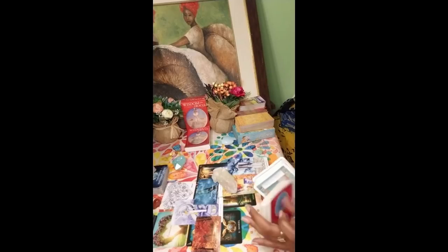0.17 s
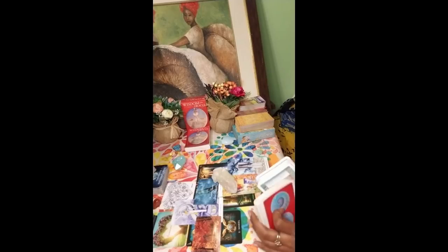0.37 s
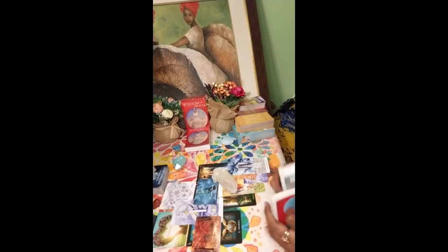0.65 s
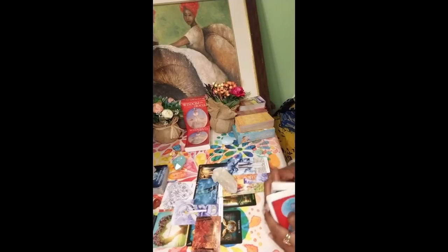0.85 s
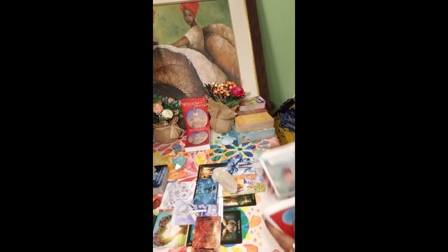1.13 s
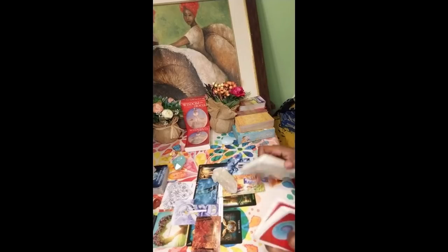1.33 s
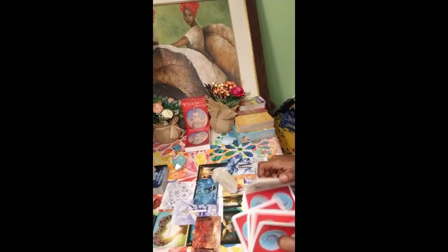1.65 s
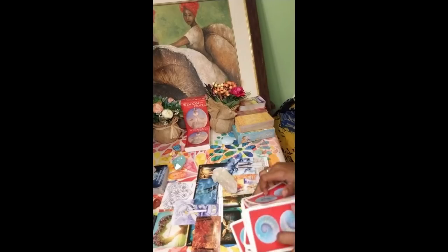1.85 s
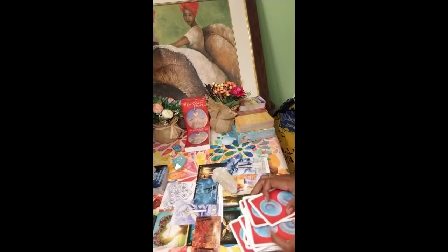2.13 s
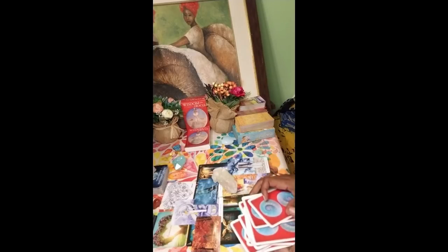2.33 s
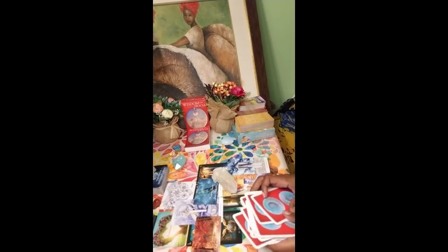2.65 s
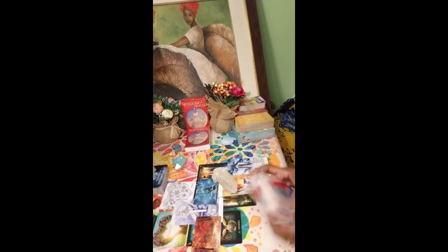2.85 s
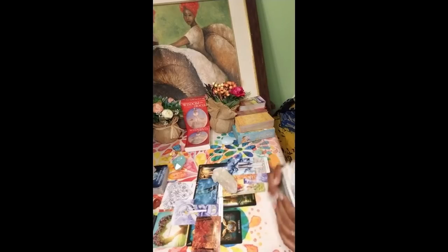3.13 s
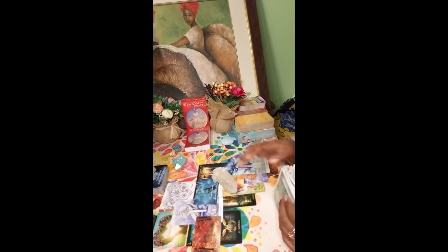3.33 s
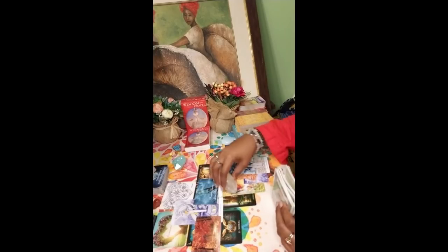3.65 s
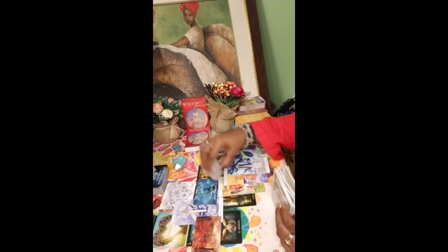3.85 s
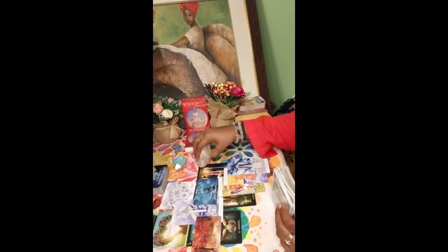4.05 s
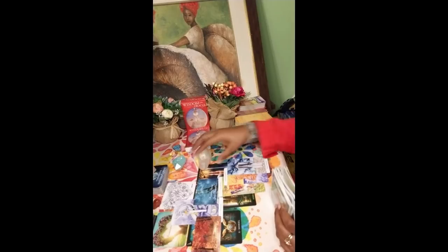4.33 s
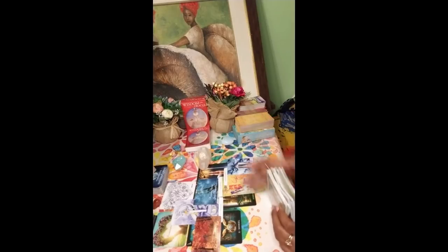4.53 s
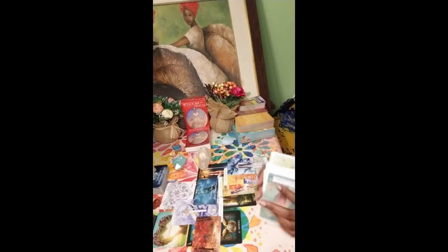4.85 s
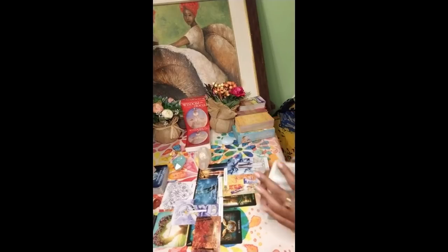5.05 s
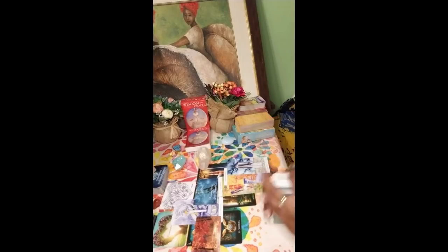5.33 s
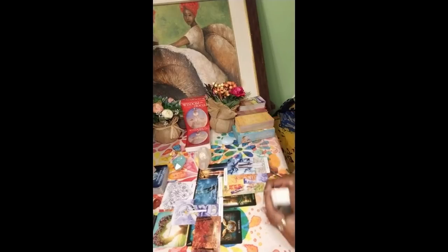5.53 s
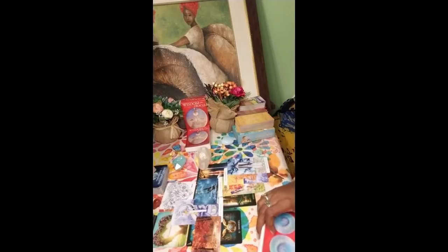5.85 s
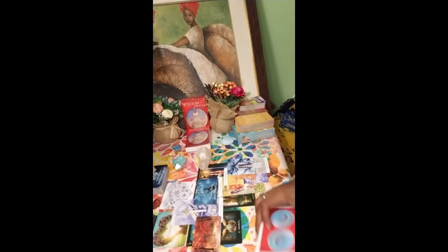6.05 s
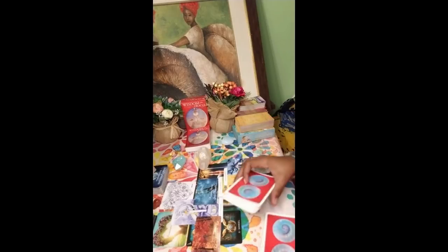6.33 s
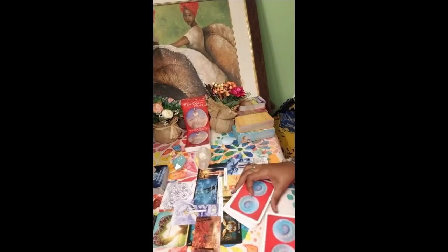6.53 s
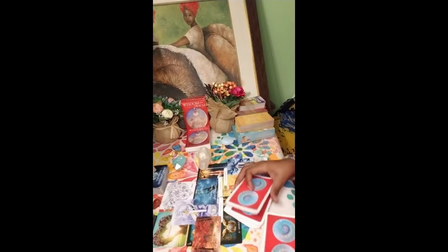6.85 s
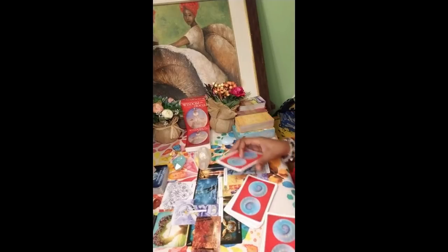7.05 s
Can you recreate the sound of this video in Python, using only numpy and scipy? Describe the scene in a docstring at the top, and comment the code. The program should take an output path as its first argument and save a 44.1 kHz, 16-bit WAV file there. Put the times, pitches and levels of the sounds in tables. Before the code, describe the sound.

In a small room, a deck of cards is knocked on a cloth-covered table close by, then spills from hand to hand in a quick run of snaps and rustles. A small stone clicks against fingernails and is set down, and a sleeve swishes softly. More sliding and knocking follows as the deck is squared and piles are laid down. A bird calls faintly outside, and a faint cat mew begins at the end.

```python
"""A deck of large cards is handled close by, at a cloth-covered table in a small room.
Knocking it square and laying down piles rings the table's modes; card faces hiss and scrape as they
slide, and packets spill from hand to hand with snapping edges. A small stone clicks as it is moved
and a sleeve brushes past. Outside a bird repeats a falling call, and at the end a cat starts a faint
mew, all over a low room tone."""
import sys
import numpy as np
from scipy import signal
from scipy.fft import rfft, irfft, next_fast_len
from scipy.io import wavfile
from scipy.ndimage import map_coordinates

SR = 44100
rng = np.random.default_rng(int(sys.argv[2]) if len(sys.argv) > 2 else 0)


def int16_out(signal):
    """Quantize to a 16-bit WAV file."""
    q = np.round(np.clip(np.atleast_2d(signal).T, -1, 1) * 32767)
    wavfile.write(sys.argv[1], SR, q.astype(np.int16))


N = 316544


def amp(db):
    return 10 ** (np.asarray(db) / 20)


def along(points, hz):
    """Read a curve of (hz, value) points on a log frequency axis."""
    f, v = np.transpose(points)
    return np.interp(np.log(hz + 1), np.log(f + 1), v)


def wobble(rate):
    """A smooth random curve, rate knots a second."""
    return map_coordinates(rng.standard_normal(int(N * rate / SR) + 4), [np.arange(N) * rate / SR])


def filtered(x, response):
    """Equalise x with a gain given as a function of frequency."""
    size = next_fast_len(N + SR // 2)
    return irfft(rfft(x, size) * response(np.fft.rfftfreq(size, 1 / SR)), size)[..., :N]


def noise(eq, grain_db=0):
    """Coloured noise of rms 1; grain_db clumps it into millisecond grains."""
    grains = rng.standard_normal(N) * amp(grain_db * (wobble(900) + wobble(90) / 2))
    coloured = filtered(grains, lambda hz: amp(along(eq, hz)))
    return coloured / np.sqrt(np.mean(coloured ** 2) + 1e-20)


def causal(gain):
    """The most compact impulse response with this gain."""
    cepstrum = irfft(np.log(np.maximum(gain, 1e-6)))
    half = len(cepstrum) // 2
    return irfft(np.exp(rfft(np.r_[cepstrum[0], 2 * cepstrum[1:half], np.zeros(half)])))


def add(track, start_s, sound):
    """Mix a sound into the track."""
    part = track[max(round(start_s * SR), 0):][:len(sound)]
    part += sound[:len(part)]


# The small room's reverb time: freq_hz, t60_s
ROOM_DECAY = [(100, 0.32), (500, 0.26), (3000, 0.35), (8000, 0.28), (15000, 0.061)]

def room(x, wet_db, build_s=0.0076):
    """Direct sound plus a diffuse tail that builds up and dies fastest in the top treble."""
    hz, t, spectrum = signal.stft(rng.standard_normal(SR // 2), SR, nperseg=256)
    decay = amp(-60 * t / along(ROOM_DECAY, hz)[:, None])
    build = 1 - np.exp(-(t / build_s) ** 2)
    tail = signal.istft(spectrum * decay * build, SR, nperseg=256)[1]
    response = amp(wet_db) * tail / np.linalg.norm(tail)
    response[0] += 1
    return signal.fftconvolve(x, response)


# Colour of the room tone: freq_hz, gain_db
ROOM_TONE_EQ = [(20, -12), (45, -7.5), (115, -2.5), (220, -15), (400, -18.5), (800, -25), (1600, -30),
                (3300, -31), (4500, -25.5), (5600, -28.5), (6800, -28), (7700, -31.5), (10000, -35),
                (16000, -39.5)]

def room_tone(bed_db=-62, hum_hz=119, hum_db=-69, drift_db=-0.2):
    """A bed of rumble and hiss that drifts a little, and a wavering low hum."""
    hum_gain = amp(hum_db + 2 * wobble(5.9))
    hum = hum_gain * np.sin(2 * np.pi * hum_hz * np.arange(N) / SR + wobble(6.4))
    return amp(bed_db + drift_db * wobble(5.5)) * noise(ROOM_TONE_EQ) + hum


# A hand or a cut pile meets the table once: start_s, level_db, weight_db, hardness_db
TOUCHES = [(0.117, -49.5, 13.5, -35), (0.367, -57.5, 11.5, -16), (3.344, -63.5, 12, -9),
           (4.167, -52, 10.5, -40), (4.335, -38, 5, -20), (4.767, -53.5, 3, 2), (5.898, -53, 3.5, -4),
           (6.485, -42.5, 7.5, -5)]
# The deck is knocked square: flat_s, level_db, weight_db, hardness_db, corner_lead_s, edge_lead_s
DECK_KNOCKS = [(0.899, -31.5, 5, 4.5, 0.041, 0.008), (3.182, -40, -3.5, -2, 0.025, 0.013),
               (5.115, -35.5, -9.5, 5, 0.033, 0.022), (5.377, -37.5, 2, -2, 0.03, 0.011)]

def blows():
    """Cue every contact with the table: start_s, level_db, weight_db, hardness_db."""
    cues = TOUCHES + [(s, db - 5.5, -3, 2) for s, db in PACKET_DROPS]  # each packet bumps the table
    for s, db, weight, hardness, corner_lead, edge_lead in DECK_KNOCKS:
        cues += [(s - corner_lead, db - 8, weight, hardness - 9.5),  # a corner lands first,
                 (s - edge_lead, db, weight, hardness - 9),  # then an edge,
                 (s, db, weight, hardness)]  # then the deck lands flat
    return cues


# Modes of the table top with the deck on it: pitch_hz, level_db, t60_s
TABLE_MODES = [(62.2, 0, 0.18), (96.2, 7, 0.1), (125, 8.5, 0.073), (169.4, 2, 0.11), (260.7, 2.5, 0.074),
               (331.7, -6, 0.11), (396, -2.5, 0.065), (513.5, -3, 0.087), (611, 3, 0.053), (687, -14, 0.15),
               (952, -14, 0.043), (1176, -24.5, 0.13), (2780, -30, 0.028)]

def table_knocks(thud_db=-4, body_db=1, clack_db=2, rise_cycles=0.28, press_s=0.00046):
    """The weight of a blow moves the table's low modes; its hardness rings the high ones."""
    out, t = np.zeros(N), np.arange(SR // 4) / SR
    hz, mode_db, t60 = np.transpose(TABLE_MODES)[:, :, None]
    cushion = (1 - np.exp(-t / (press_s + rise_cycles / hz))) ** 2  # the cloth softens the attack
    for s, db, weight, hardness in blows():
        eq = [(125, thud_db + weight), (200, body_db), (380, body_db), (520, clack_db + hardness)]
        # each spot and grip weights, detunes and turns the modes anew
        spot_db, detune, phase = rng.standard_normal((3, len(TABLE_MODES), 1))
        envelope = cushion * amp(db + along(eq, hz) + mode_db + spot_db - 60 * t / t60)
        modes = envelope * np.sin(2 * np.pi * hz * (1 + 0.018 * detune) * t + phase)
        add(out, s, room(modes.sum(0), wet_db=-11))
    return out


def stroke(peak_s, rise_s, fall_s, range_db=21):
    """Envelope of a movement that gains range_db over its rise and loses it over its fall."""
    t = np.arange(N) / SR - peak_s
    distance = np.maximum(-t / rise_s, t / fall_s)
    return amp(-range_db * np.minimum(distance, 10))


# Card slides on card: peak_s, rise_s, fall_s, hiss_db, scrape_db
CARD_SLIDES = [(0.145, 0.057, 0.63, -67, -77), (0.901, 0.019, 0.094, -69, -52.5),
               (2.42, 0.025, 0.15, -62.5, -63), (2.965, 0.18, 0.076, -61.5, -55),
               (3.178, 0.12, 0.14, -60, -59.5), (4.609, 0.019, 0.14, -57.5, -58),
               (4.705, 0.08, 0.14, -58.5, -64), (4.865, 0.23, 0.15, -61.5, -68),
               (5.11, 0.041, 0.41, -65.5, -73), (5.379, 0.0099, 0.13, -64.5, -67),
               (5.912, 0.28, 0.09, -63.5, -72), (6.488, 0.042, 0.095, -58.5, -58)]
# Colours of a light and of a pressed slide: freq_hz, gain_db
HISS_EQ = [(1500, -41), (2600, -8), (4500, 3.5), (7000, 1.5), (11000, -1), (16000, -15)]
SCRAPE_EQ = [(150, -1), (450, -1.5), (900, -1.5), (1500, -7), (2300, -1), (3200, -3.5), (5000, -21)]

def card_slides(hiss_trim_db=-1, scrape_trim_db=2):
    """Faces rub in tiny slips: a light stroke hisses, a pressed one scrapes."""
    hiss, scrape = noise(HISS_EQ, grain_db=2.5), noise(SCRAPE_EQ, grain_db=2.5)
    out = np.zeros(N)
    for s, rise, fall, hiss_db, scrape_db in CARD_SLIDES:
        friction = amp(hiss_db + hiss_trim_db) * hiss + amp(scrape_db + scrape_trim_db) * scrape
        out += stroke(s, rise, fall) * friction
    return out


def wavering_phase(hz, waver):
    """Phase of a tone whose pitch jitters by the fraction waver."""
    return 2 * np.pi * np.cumsum(hz * (1 + waver * wobble(250))) / SR


# The bird's falling calls: start_s, level_db
BIRD_CALLS = [(0.791, -56), (2.165, -54.5), (2.885, -51.5), (3.663, -57), (4.534, -55.5)]
# Contour of one call: offset_s, pitch_hz, gain_db
CALL_CONTOUR = [(0, 3487, -6), (0.016, 3497, -7), (.045, 3400, -11), (0.058, 2950, -8), (.08, 2550, -2.5),
                (0.114, 2800, -26), (0.15, 2360, -9)]
# Its low, gliding whistles: start_s, length_s, from_hz, to_hz, level_db
BIRD_WHISTLES = [(2.398, 0.3, 2020, 1970, -75), (3.059, 0.13, 2470, 2170, -64.5),
                 (3.259, 0.18, 2054, 2316, -68)]

def bird(trim_db=-10):
    """A clear high note tumbles into a rasp, with low whistles between; heard mostly by reflection."""
    t, song = np.arange(N) / SR, np.zeros(N)
    offset_s, pitch_hz, contour_db = np.transpose(CALL_CONTOUR)
    for s, db in BIRD_CALLS:
        rasp = np.interp(t - s, [0.04, 0.07], [0.028, 0.085])
        envelope = amp(db + np.interp(t - s, offset_s, contour_db, left=-np.inf, right=-np.inf))
        song += envelope * np.sin(wavering_phase(np.interp(t - s, offset_s, pitch_hz), waver=rasp))
    for s, length, from_hz, to_hz, db in BIRD_WHISTLES:
        progress = np.clip((t - s) / length, 0, 1)
        glide_hz = from_hz + (to_hz - from_hz) * progress
        song += amp(db) * np.sin(np.pi * progress) * np.sin(wavering_phase(glide_hz, waver=0.04))
    return amp(trim_db) * room(song, wet_db=8, build_s=0.016)[:N]


def ticks(cues, eq, chatter_t60_s, wet_db, ring_db=0, ring_octaves=1, chatter=0.14, trim_db=0.5):
    """Sharp contacts with a brief chatter; ring_db lifts one broad resonance at each cue's pitch."""
    out, t = np.zeros(N), np.arange(1024) / SR
    hz = np.fft.rfftfreq(len(t), 1 / SR)
    for s, db, pitch_hz in cues:
        force = chatter * rng.standard_normal(len(t)) * amp(-60 * t / chatter_t60_s)
        force[0] = -1  # the first contact
        resonance_db = ring_db * np.exp(-(np.log2((hz + 1) / pitch_hz) / ring_octaves) ** 2)
        tick = signal.fftconvolve(force, causal(amp(along(eq, hz) + resonance_db)))
        add(out, s, room(amp(db + trim_db) * tick / np.abs(tick).max(), wet_db))
    return out


# Card edges snap: start_s, level_db, pitch_hz
CARD_SNAPS = [(0.9014, -40, 2740), (1.5269, -33.5, 2770), (1.5534, -40, 2230), (1.5638, -26, 2250),
              (1.5753, -29, 2870), (1.6113, -23, 3250), (1.6164, -21, 2470), (1.6581, -23.5, 2300),
              (1.6624, -29, 2430), (1.6671, -25, 3230), (1.7035, -28.5, 2820), (1.733, -26, 2020),
              (1.7853, -32.5, 1950), (1.8058, -33.5, 2190), (1.8284, -33, 2240), (1.8372, -19.5, 2330),
              (1.8494, -21.5, 4560), (1.9804, -42, 2220), (2.0612, -42.5, 4970), (4.6862, -41, 4400),
              (4.7684, -44.5, 2470), (5.6178, -48, 6900), (5.7987, -48, 4340)]
# Colour of a snap: freq_hz, gain_db
SNAP_EQ = [(100, -10.5), (400, 4), (900, 5.5), (1500, -6.5), (2500, 0), (4200, -3), (6000, -6.5),
           (10000, -9), (16000, -20.5)]

def card_snaps():
    """Bent cards spring free and flick their neighbours."""
    return ticks(CARD_SNAPS, SNAP_EQ, chatter_t60_s=0.017, wet_db=-13, ring_db=13.5, ring_octaves=0.69)


# Packets of cards drop into the other hand: peak_s, level_db
PACKET_DROPS = [(1.512, -45), (1.552, -38.5), (1.613, -39), (1.659, -41), (1.736, -50.5), (1.788, -47.5),
                (1.808, -40), (1.839, -38), (1.982, -51), (2.062, -59)]
# Colour of the spill: freq_hz, gain_db
SPILL_EQ = [(60, -20), (150, -4), (400, 6.5), (800, 5.5), (1400, 2.5), (2400, -8), (3500, -8), (5000, -9),
            (9000, -15), (16000, -25)]

def card_spill(trim_db=-3):
    """Falling packets tumble and settle, each in a burst of grainy rustle."""
    bursts = sum(amp(db + trim_db) * stroke(s, rise_s=0.0083, fall_s=0.084) for s, db in PACKET_DROPS)
    return bursts * noise(SPILL_EQ, grain_db=2.5)


# A small stone meets fingernails: start_s, level_db, pitch_hz (silent while ring_db is 0)
STONE_CLICKS = [(3.4362, -43, 2330), (3.4414, -40.5, 3450), (3.4512, -40, 6010), (3.478, -34, 3920),
                (3.8392, -31, 3750), (3.8465, -29, 2960), (4.326, -41.5, 3940)]
# Colour of a click: freq_hz, gain_db
CLICK_EQ = [(100, -9), (1000, -12), (1500, -8), (2200, -1.5), (4000, -2.5), (6000, -9.5), (11000, -16.5),
            (16000, -21)]

def stone_clicks():
    """Thin, hard clicks against the nails as the stone is picked up and moved."""
    return ticks(STONE_CLICKS, CLICK_EQ, chatter_t60_s=0.016, wet_db=-6)


# Colour of brushing cloth: freq_hz, gain_db
SLEEVE_EQ = [(4000, -32), (9000, -10), (12000, -1), (16000, -5)]

def sleeve_swish(level_db=-59):
    """A sleeve brushes past with one airy swish."""
    envelope = stroke(peak_s=4.5, rise_s=0.072, fall_s=0.06)
    return amp(level_db) * envelope * noise(SLEEVE_EQ, grain_db=2.5)


# Harmonics of the mew, each opening at its own pace: harmonic_number, level_db, swell_s
MEW_HARMONICS = [(1, -49, 0.061), (2, -63.5, 0.02), (3, -63, 0.07), (6, -80, 0.053), (7, -77, 0.032),
                 (11, -77, 0.074), (13, -83.5, 0.073)]

def cat_mew(start_s=6.91, pitch_hz=682.3, scoop_hz=31.9, scoop_s=0.06, swell_db=40, flutter_db=2.63):
    """A thin mew scoops up to pitch and swells from across the room, each harmonic fluttering."""
    t, voice = np.maximum(np.arange(N) / SR - start_s, 0), np.zeros(N)
    phase = wavering_phase(pitch_hz - scoop_hz * np.exp(-t / scoop_s), waver=0.016)
    for k, db, swell_s in MEW_HARMONICS:
        envelope = amp(db - swell_db * np.exp(-t / swell_s))
        flutter = amp(flutter_db * np.sqrt(k) * wobble(30))
        voice += envelope * flutter * np.sin(k * phase)
    return room((t > 0) * voice, wet_db=-12)[:N]


def scene(side_db=-82):
    """Everything is centred; only a faint top hiss differs between the ears."""
    hits = table_knocks() + card_snaps() + stone_clicks()
    rustle = room(card_spill() + card_slides() + sleeve_swish(), wet_db=-15)[:N]
    mid = hits + rustle + bird() + cat_mew() + room_tone()
    side_eq = [(100, -19), (700, -11), (2500, -25), (6000, -13), (11000, 1.5), (16000, 1)]
    side = amp(side_db) * noise(side_eq)
    return np.array([mid + side, mid - side])


def record(dry, cutoff_hz=15850):
    """A brick-wall low-pass takes off the very top."""
    return filtered(dry, lambda hz: hz < cutoff_hz)


dry = scene()
out = record(dry)
int16_out(out)
```